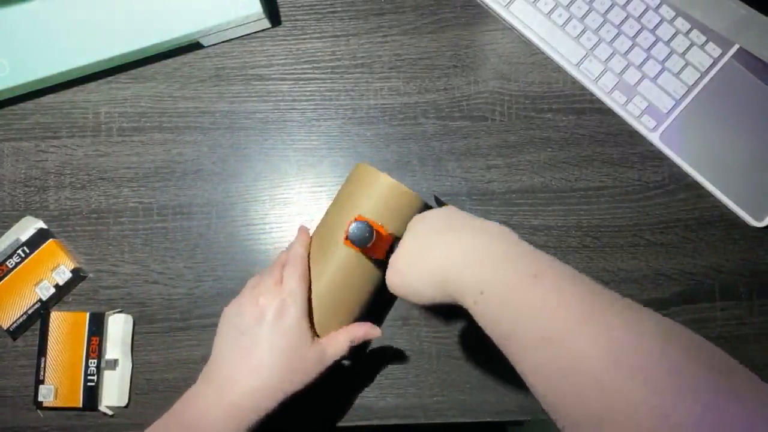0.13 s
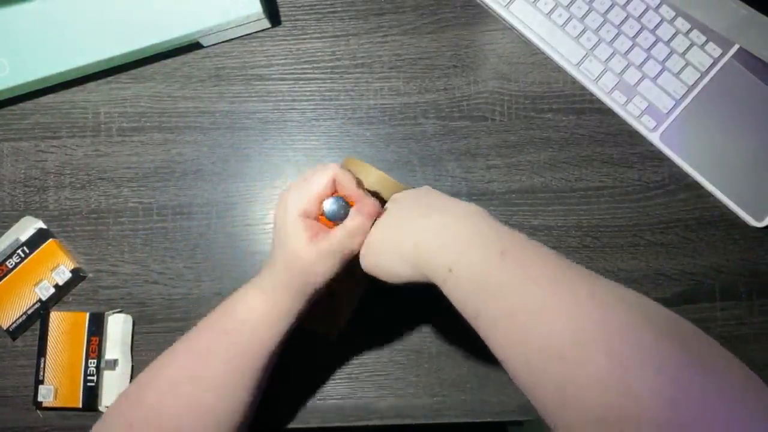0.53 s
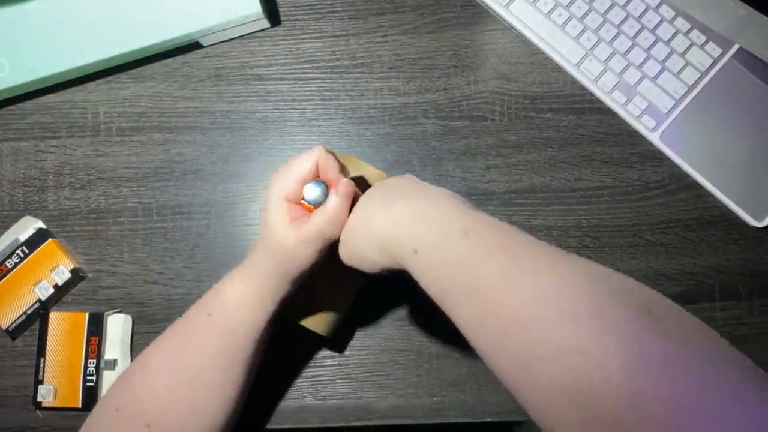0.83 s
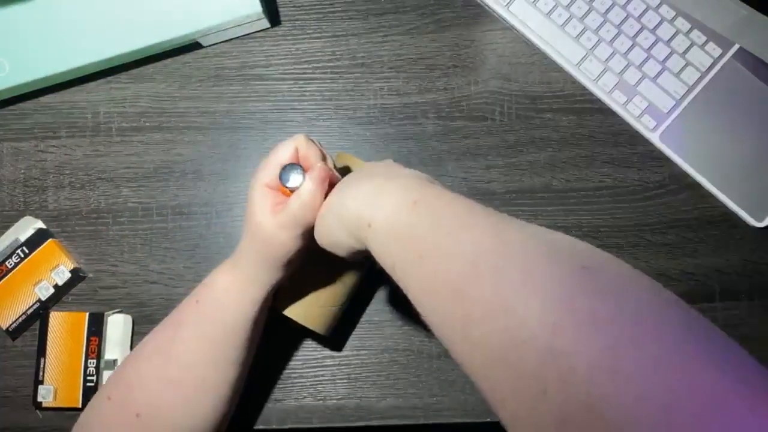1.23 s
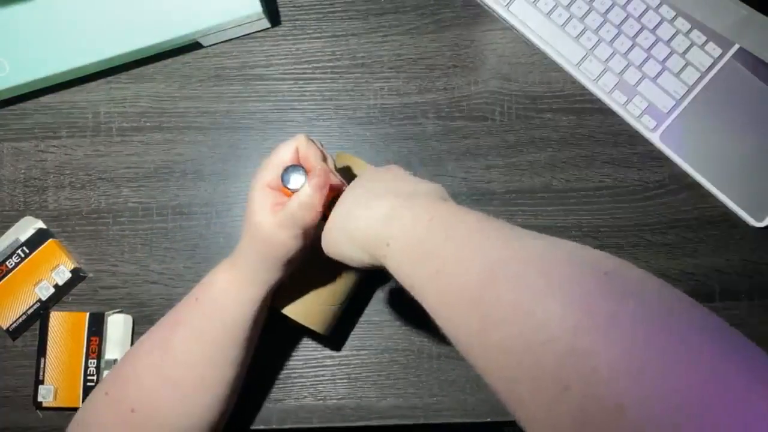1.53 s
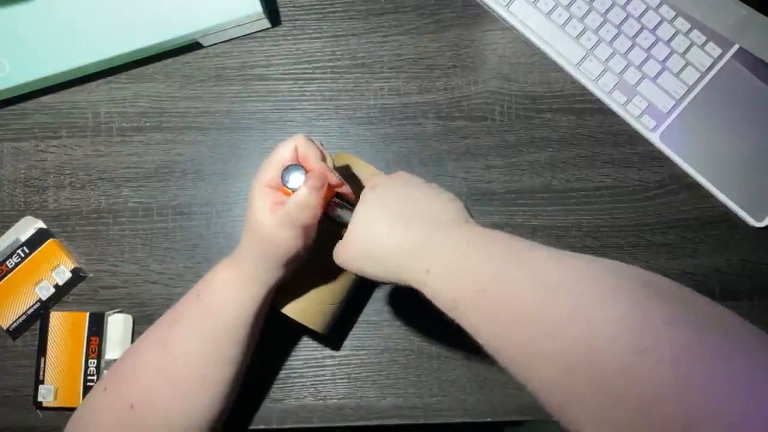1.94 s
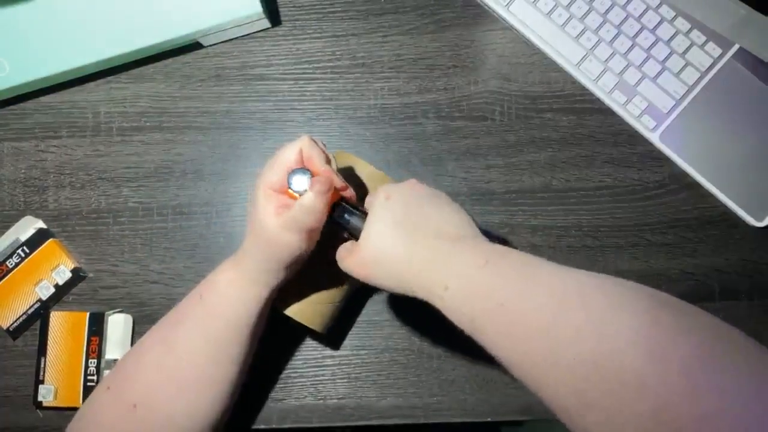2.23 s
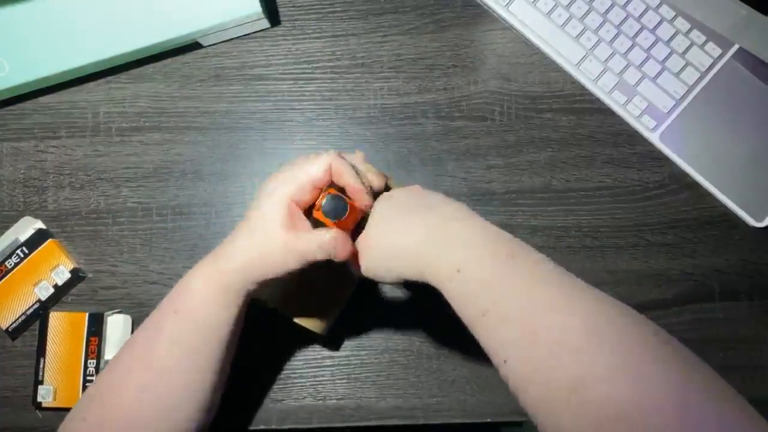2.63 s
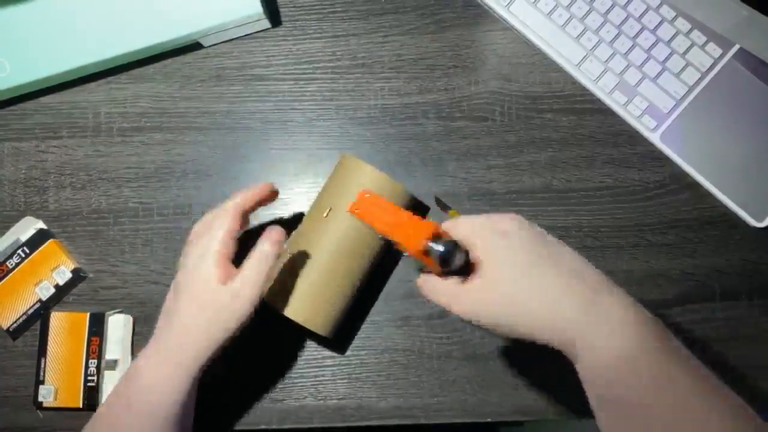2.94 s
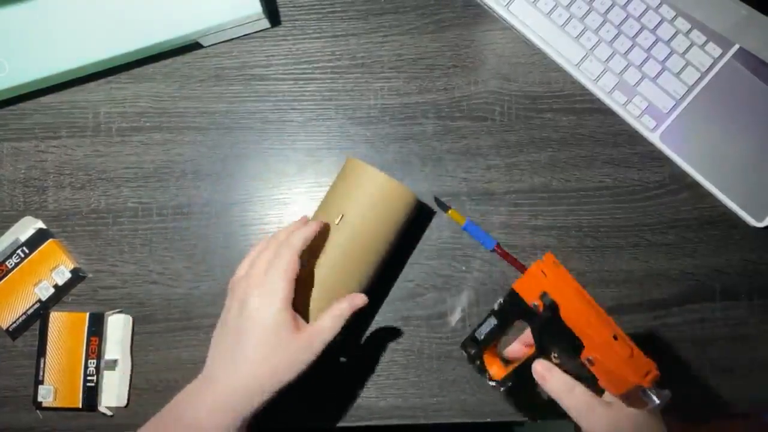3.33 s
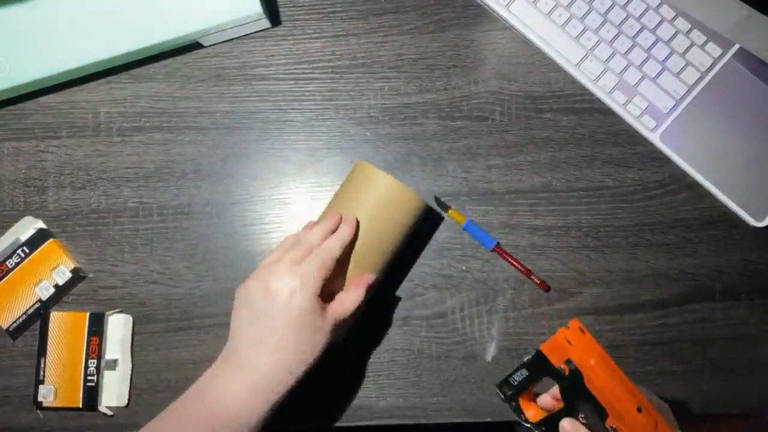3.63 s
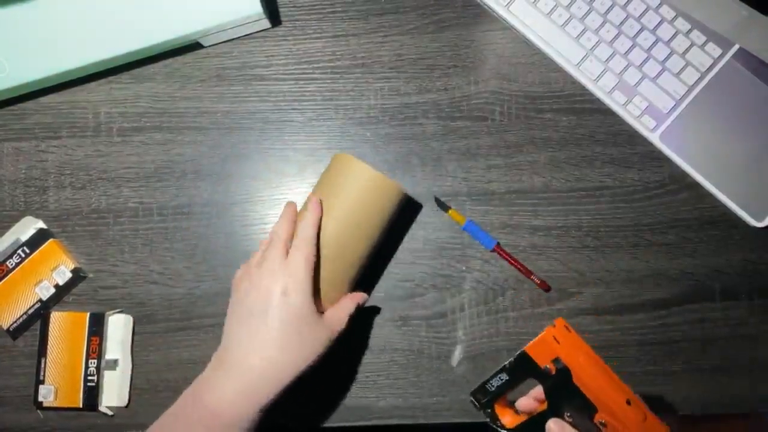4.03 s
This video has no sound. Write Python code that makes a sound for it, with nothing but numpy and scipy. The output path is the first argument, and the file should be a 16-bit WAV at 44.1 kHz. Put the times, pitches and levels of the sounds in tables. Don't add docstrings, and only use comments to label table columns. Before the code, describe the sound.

Close at a desk in a small room with a low fan hum, hands rub faintly and tiny metal ticks sound. A spring lever creaks under strain, then a steel staple gun fires with a violent double crack and a hollow tube and desk thump. About half a second later the lever clacks back brightly. Skin and sleeve brush the desk afterwards. Close stereo microphone, its level dipping after the blows.

```python
import sys
import numpy as np
from scipy import signal
from scipy.fft import rfft, irfft, next_fast_len
from scipy.io import wavfile
from scipy.ndimage import map_coordinates

SR = 44100
rng = np.random.default_rng(int(sys.argv[2]) if len(sys.argv) > 2 else 0)


def natural_amplitude(level_db):
    exponent = np.asarray(level_db, float) / 20
    return 10 ** exponent


def unload_wav(signal):
    wavfile.write(
        sys.argv[1],
        SR,
        np.round(np.clip(np.atleast_2d(signal).T, -1, 1) * 32767).astype(np.int16),
    )


N = 185245

# [f/Hz, density/dB per Hz]
AIR_SPECTRUM = [(15, -49), (25, -7), (64, -3.5), (161, -9), (185, -9), (277, -11), (384, -16), (416, -8.5),
                (545, -12), (591, -11.5), (988, -16.5), (1700, -24.5), (2110, -25.5), (3160, -30.5),
                (16000, -75.5)]
# [f/Hz, width/Hz, level/dB]
FAN_LINES = [(58.6, 30, -66), (118.6, 30.7, -62), (328, 24, -66), (379.9, 32, -56.5), (562, 47, -65.5)]
# [f/Hz, correlation]
CHANNEL_LIKENESS = [(60, 0.83), (150, 0.9), (380, 0.69), (950, 0.033), (2380, 0.15), (5980, 0.22),
                    (15000, 0.2)]
# [f/Hz, t60/s]
ROOM_DECAY = [(150, 0.19), (700, 0.22), (2000, 0.27), (4000, .32), (7000, 0.25), (11000, 0.25),
              (15000, 0.23)]
# [f/Hz, lead/rad]
PORT_LEAD = [(0, 0), (600, .6), (1200, .15), (3300, .6), (4600, 1.7), (6200, .7), (9000, 2.1), (11500, 1.1),
             (16000, 1.7)]
# [f/Hz, level/dB]
PORT_LEAN = [(60, -.5), (200, 0), (380, -2), (700, -2.5), (1290, -.5), (2380, -2), (4400, -1.5), (8120, 1),
             (15000, .5)]
# [f/Hz, density/dB per Hz]
SKIN_SPECTRUM = [(700, -30), (1300, -10), (2600, -6), (3400, -3), (4300, 0), (5300, -5), (6300, -3),
                 (7800, -8), (9100, -6), (10000, -12), (12500, -11), (15500, -11), (17000, -14)]
# [t/s, length/s, level/dB, share of dry skin: the rest is dull cloth or card]
HAND_STROKES = [(-.3, 0.79, -66, .4), (.68, .14, -89, .9), (1.2, 0.8, -70.5, .3), (1.799, 0.43, -69, .6),
                (2.14, 0.4, -45, .2), (2.469, 0.15, -56, .6), (2.641, .19, -54.5, .5), (3.3, 0.5, -74, .1),
                (3.45, 0.11, -60.5, .9), (3.522, 0.13, -64.5, .6), (3.745, 0.27, -55.5, .9),
                (3.879, 0.21, -54.5, .9), (4.02, .15, -73.5, .9), (4.165, 0.11, -62, .9)]
# [t/s, tube level/dB, desk level/dB, contact cut-off f/Hz, tube pitch ratio: low when hand-loaded]
SOFT_KNOCKS = [(.010, -37, -64, 1000, 1.06), (0.014, -26, -26, 704, .62), (0.021, -43, -24.5, 112, .6),
               (0.035, -28.5, -27.5, 380, 0.57), (0.073, -38, -37, 300, 0.65), (0.529, -63, -70, 193, 1.3),
               (1.801, -32, -48.5, 1187, 1.08), (1.817, -46, -67, 1184, 1),
               (2.012, -41.5, -71.5, 1176, 1.05), (2.082, -31.5, -44, 1580, 0.97),
               (2.1278, -1.5, -25, 1232, 1), (2.1281, -13.5, -5.5, 613, .8), (2.365, -23, -32, 1210, 1.106),
               (2.372, -32, -24, 574.5, 0.81), (2.441, -41.5, -36, 396, 0.58), (2.498, -42, -42.5, 301, .8),
               (2.626, -22.5, -24, 1205, 0.83), (2.639, -28, -29.5, 500, 0.62),
               (2.759, -42, -41, 256, 1.03), (2.942, -66, -46, 248, 1), (3.166, -69, -52, 150, 0.93),
               (3.488, -55, -44, 402, 1.26)]
# [f/Hz, level/dB, t60/s]
TUBE_MODES = [(396, -6.5, 0.015), (490, 0, 0.038), (616, 8.5, 0.032), (737, -0.5, 0.054), (772.6, 0, 0.053),
              (839, -0.5, 0.019), (960, -9.5, 0.039), (1390, -5, 0.023), (1803, -31.5, .03)]
# [f/Hz, level/dB, t60/s]
DESK_MODES = [(62, -5, .13), (125, -1, .11), (165, -7, .07), (206, 0, .08), (270, -8, .08), (350, -7, .07)]
# [t/s, length/s, level/dB]
LEVER_CREAKS = [
    (-.2, 0.45, -64),
    (1.36, 0.16, -66.5),
    (1.48, 0.28, -62.5),
    (1.765, 0.065, -53.5),
    (1.81, 0.07, -49.5),
    (1.895, 0.047, -57.5),
    (1.975, .058, -48),
    (2.055, 0.021, -55.5),
    (2.45, 0.14, -51),
    (3.2, 0.5, -64),
]
# [f/Hz, width/Hz, level/dB]
PIVOT_RESONANCES = [(1500, 432, 1.5), (2050, 430, 7.5), (2730, 540, 7), (4172, 2600, -1)]
# [let go t/s, stop t/s, level at stop/dB]
SLIDING_RUNS = [
    (2.058, 2.125, -18.5),
    (2.621, 2.633, -33.5),
]
# [f/Hz, density/dB per Hz]
CRACK_SPECTRUM = [(400, -17.5), (800, -27.5), (1300, -10.5), (2100, -7), (3000, -11.5), (4300, -4),
                  (6000, -11.5), (8500, -7.5), (11000, -14.5), (13500, -15.5), (15500, -8), (17000, -29)]
# [f/Hz, level/dB, t60/s]
SPRING_MODES = [(1299, -14, 0.078), (1690, -8.5, .04), (2280, -3.5, 0.042), (2576, -2, .18),
                (2780, -5, .08), (3088, -10, 0.1), (3690, -17, 0.13), (4300, -4.5, .06), (5370, -9.5, .13),
                (6050, -14, .08), (7025, -15, .03), (8434, -14.5, .02), (12200, -24, .04),
                (14700, -13, .05)]
# [f/Hz, level/dB, t60/s]
LEVER_MODES = [(1478, -9.5, .03), (1810, 1, 0.061), (2620, -7, 0.053), (2790, 0.5, 0.076),
               (3120, -4.5, 0.087), (3430, -9.5, 0.072), (4007, -2.5, 0.088), (5530, 1.5, .1),
               (6300, -7.5, .04), (6440, -10, .04), (8020, -10, .04), (10800, -19, .04), (11700, -14, .05),
               (13780, -15.5, .03)]
# [t/s, level/dB, rattle/s, brightness/dB per octave, ring level/dB]
SMALL_TICKS = [(.149, -47.5, 0.013, -2, -6), (.279, -37, 0.0032, -5, -10.5),
               (.452, -43.5, 0.0089, -10.5, -24), (1.012, -41, 0.0033, 11, -33),
               (1.268, -45, 0.0024, -4.5, -33), (1.800, -35, 0.0021, -7.5, 0.5),
               (1.807, -26, 0.0029, -6.5, -15), (1.817, -46.5, 0.0031, -1, -39),
               (1.9958, -30.5, .001, -19, -8), (2.013, -45, 0.0019, -21.5, -6.5),
               (2.025, -49, 0.0019, -9.5, -4), (2.367, -29, 0.0052, -9.5, -8.5),
               (2.513, -36.5, 0.0041, -8, -15), (3.500, -46, 0.0058, -7, -22),
               (4.130, -44, 0.0047, 6.5, -24.5)]
# [t/s, level/dB, rattle/s, brightness/dB per octave, ring level/dB]
RETURN_BLOWS = [
    (2.586, -24, 0.0056, -9.5, -27.5),
    (2.6145, -34, 0.00055, -4, -24.5),
    (2.6185, -2.5, 0.0026, 4, -13),
    (2.6205, -1, 0.0014, 1, -29.5),
    (2.6238, -7.5, 0.0019, -5, -11),
    (2.636, -25, 0.0051, -6.5, -10),
    (2.645, -30, 0.0045, -5, -15),
    (2.653, -32, .003, 2.5, -10),
    (2.666, -24, 0.024, 4, -10.5),
]
# [t/s, level/dB, rattle/s, brightness/dB per octave, ring level/dB]
TRIP_BLOWS = [
    (2.0775, -25, 0.0015, 3.5, -11),
    (2.0802, -1, 0.004, -3.5, -8),
    (2.0835, 0.5, 0.0028, 0.5, -29),
    (2.0862, -7.5, 0.01, -3.5, -11),
    (2.1205, -6.5, 0.0068, -0.5, -14),
    (2.1252, 9, 0.0016, -4, -18.5),
    (2.1278, 7, 0.0024, -5, -20.5),
    (2.132, -3, 0.004, -6, -18),
]


def unit(x):
    return x / np.sqrt(np.mean(x ** 2) + 1e-20)


def along(points, hz):
    f, value = np.transpose(points)
    return np.interp(np.log(hz + 1), np.log(f + 1), value)


def wobble(rate):
    knots = rng.standard_normal(int(N * rate / SR) + 4)
    return map_coordinates(knots, [np.arange(N) * rate / SR])


def filtered(x, response):
    n = x.shape[-1]
    size = next_fast_len(n + 8192)
    spectrum = rfft(x, size) * response(np.fft.rfftfreq(size, 1 / SR))
    return irfft(spectrum, size)[..., :n]


def resonant(peaks):
    def response(f):
        total = 0
        for k, (centre, width, db) in enumerate(peaks):
            damping = 1j * f * width
            total = total + (-1) ** k * natural_amplitude(db) * damping / (centre * centre - f * f + damping)
        return total
    return response


def ringing(modes, scatter_db, pitch=1):
    t = np.arange(SR // 5) / SR
    total = np.zeros(len(t))
    for k, (mode_hz, db, t60) in enumerate(modes):
        hz = pitch * mode_hz
        decay = natural_amplitude(db + scatter_db * rng.standard_normal() - 60 * t / t60)
        twin_hz = hz * (1 + .018 * rng.standard_normal())
        pair = np.sin(2 * np.pi * hz * t) + .7 * np.sin(2 * np.pi * twin_hz * t)
        total += (-1) ** k * decay * pair
    return total


def add(track, s, sound):
    i = round(s * SR)
    track[i:i + len(sound)] += sound[:len(track) - i]


def stereo_noise(response):
    def mid_side(hz):
        angle = np.arccos(np.clip(along(CHANNEL_LIKENESS, hz), -1, 1)) / 2
        return response(hz) * np.array([np.cos(angle), np.sin(angle)])
    mid, side = filtered(rng.standard_normal((2, N)), mid_side)
    return unit(np.array([mid + side, mid - side]))


def strokes(rows, swell, die):
    start, length, db = np.transpose(rows)[..., None]
    progress = (np.arange(N) / SR - start) / length
    shape = np.clip(np.minimum(progress / swell, (1 - progress) / die), 0, 1) ** 2
    return np.sqrt(np.sum((natural_amplitude(db) * shape) ** 2, axis=0))


def fan():
    air_gain = natural_amplitude(-54.5 + 0.29 * wobble(10))
    air = air_gain * stereo_noise(lambda hz: natural_amplitude(along(AIR_SPECTRUM, hz)))

    def hum(hz):
        return sum(natural_amplitude(db) / np.sqrt(width) * abs(resonant([(centre, width, 0)])(hz)) ** 2
                   for centre, width, db in FAN_LINES)
    return air + natural_amplitude(-55.5) * stereo_noise(hum)


def room(x):
    hz, t, z = signal.stft(rng.standard_normal((2, SR // 2)), SR, nperseg=256)
    apart = (hz / (hz + 900))[:, None]
    z = np.array([z[0] + apart * z[1], z[0] - apart * z[1]]) / np.sqrt(1 + apart ** 2)
    decay = natural_amplitude(-60 * t / along(ROOM_DECAY, hz)[:, None])
    tail = signal.istft(z * decay, SR, nperseg=256)[1]
    delayed = np.pad(x, (250, 0))[None]
    return signal.fftconvolve(delayed, tail / np.linalg.norm(tail[0]), axes=1)[:, :N]


def ports(x):
    def both(hz):
        half = natural_amplitude(along(PORT_LEAN, hz) / 2) * np.exp(.5j * along(PORT_LEAD, hz))
        return np.array([half, 1 / half])
    return filtered(np.array([x, x]), both)


def hands():
    flutter = natural_amplitude(.8 * wobble(30) + 1.5 * wobble(300))
    noise = rng.standard_normal((3, N)) * flutter
    shared_and_own = noise[0] + 1.73 * noise[1:]
    hiss = unit(filtered(shared_and_own, lambda hz: natural_amplitude(along(SKIN_SPECTRUM, hz))))
    dull = unit(filtered(hiss, lambda hz: 1 / (1 + (hz / 6750) ** 6)))
    ease = dict(swell=0.26, die=.45)
    pace = strokes([row[:3] for row in HAND_STROKES], **ease)
    skin_rows = [(s, length, db + 20 * np.log10(np.clip(share, .01, 1))) for s, length, db, share in HAND_STROKES]
    skin = strokes(skin_rows, **ease)
    resting = natural_amplitude(-85.5)
    return ((skin + resting) * hiss + (pace - skin) * dull) * natural_amplitude([[-.5], [.5]])


def knocks():
    track, t = np.zeros(N), np.arange(SR // 50) / SR
    for s, tube_db, desk_db, soft_hz, pitch in SOFT_KNOCKS:
        push = t * np.exp(-2 * np.pi * soft_hz * t)
        tube = signal.fftconvolve(push, ringing(TUBE_MODES, 1.3, pitch))
        desk = signal.fftconvolve(push, ringing(DESK_MODES, 5.7))
        add(track, s, natural_amplitude(tube_db) * tube / abs(tube).max())
        add(track, s + .003, natural_amplitude(desk_db) * desk / abs(desk).max())
    return track


def creak():
    slips = (rng.random(N) < 2200 / SR) * rng.standard_normal(N) * natural_amplitude(2.7 * wobble(90))
    pivot = resonant(PIVOT_RESONANCES)
    tight = unit(filtered(slips, lambda hz: pivot(hz) ** 2))
    slack = unit(filtered(slips, lambda hz: pivot(hz * 1.3) ** 2))
    s = np.arange(N) / SR
    loaded = (s > 1.2) & (s < 2.2)
    return strokes(LEVER_CREAKS, swell=0.45, die=0.18) * np.where(loaded, tight, slack)


def speed():
    go, stop, db = np.transpose(SLIDING_RUNS)[..., None]
    s = np.arange(N) / SR
    moving = np.clip((s - go) / (stop - go), 0, 1) ** 2.5
    settle = np.exp(-(np.maximum(s - stop, 0) / 0.017) ** 2)
    return np.sum(natural_amplitude(db) * moving * settle, axis=0)


def travel():
    grit = rng.standard_normal(N) * natural_amplitude(0.91 * wobble(450))
    buzz = unit(signal.fftconvolve(grit, ringing(SPRING_MODES, scatter_db=0))[:N])
    guides = unit(filtered(grit, lambda hz: natural_amplitude(along(CRACK_SPECTRUM, hz)) / (1 + (hz / 9400) ** 4)))
    return speed() * (buzz + natural_amplitude(3.0) * guides)


def steel(blows, modes):
    cracks, rings, t = np.zeros(N), np.zeros(N), np.arange(SR // 16) / SR
    for s, db, rattle, tilt_db, ring_db in blows:
        shape = (1 - np.exp(-t / .0006)) * np.exp(-(t / rattle) ** 0.97)
        contacts = rng.standard_normal(len(t)) * natural_amplitude(4 * rng.standard_normal(len(t)))
        chatter = shape * contacts
        bright = lambda hz: natural_amplitude(tilt_db * np.log2((hz + 1500) / 5500))
        crack = filtered(chatter, lambda hz: natural_amplitude(along(CRACK_SPECTRUM, hz)) * bright(hz))
        ring = filtered(signal.fftconvolve(chatter, ringing(modes, scatter_db=2.5)), bright)
        add(cracks, s, natural_amplitude(db) * crack / abs(crack).max())
        add(rings, s, natural_amplitude(db + ring_db) * ring / abs(ring).max())
    return cracks, rings


def scene():
    snap, spring = steel(TRIP_BLOWS, SPRING_MODES)
    clack, lever = steel(RETURN_BLOWS, LEVER_MODES)
    tick, tink = steel(SMALL_TICKS, LEVER_MODES)
    scrape, thumps = travel() + creak(), knocks()
    wet = natural_amplitude(-8.5) * room(snap + 0.51 * spring)
    wet = wet + natural_amplitude(-7) * room(clack + .3 * lever)
    wet = wet + natural_amplitude(-7) * room(tick + 0.67 * scrape)
    wet = wet + natural_amplitude(-9) * room(thumps)
    near = snap + spring + clack + lever + tick + tink + scrape + thumps
    return ports(near) + wet + hands() + fan()


def low_pass(x):
    return signal.sosfilt(signal.butter(12, 16550, fs=SR, output="sos"), x)


def record(dry):
    x = signal.sosfilt(signal.butter(3, 42, "high", fs=SR, output="sos"), dry)
    loud = np.mean(x ** 2, axis=0)
    for seconds in (.025, .055):
        keep = np.exp(-1 / (seconds * SR))
        loud = signal.lfilter([1 - keep], [1, -keep], loud)
    knee_db, ceiling = -38, .85
    x = x * (1 + loud / natural_amplitude(knee_db) ** 2) ** -.25
    x = x / (1 + (x / ceiling) ** 4) ** .25
    top_hz = 15900
    mix = filtered(x, lambda hz: natural_amplitude(-32 * np.clip((hz - top_hz) / 350 + .65, 0, 1)))
    return low_pass(mix)


dry = scene()
out = record(dry)
unload_wav(out)
```